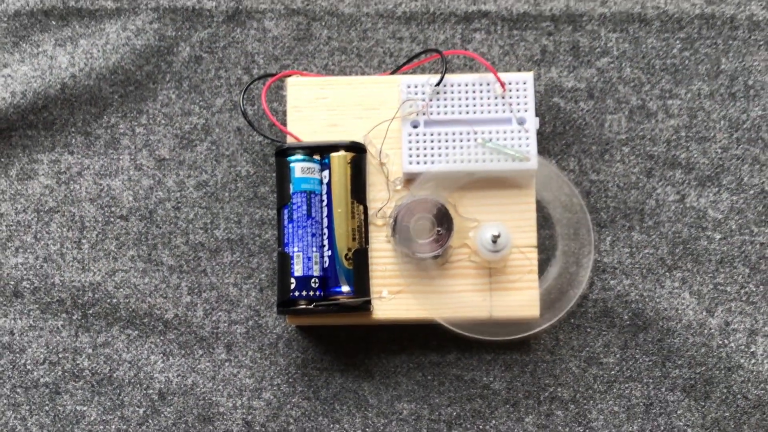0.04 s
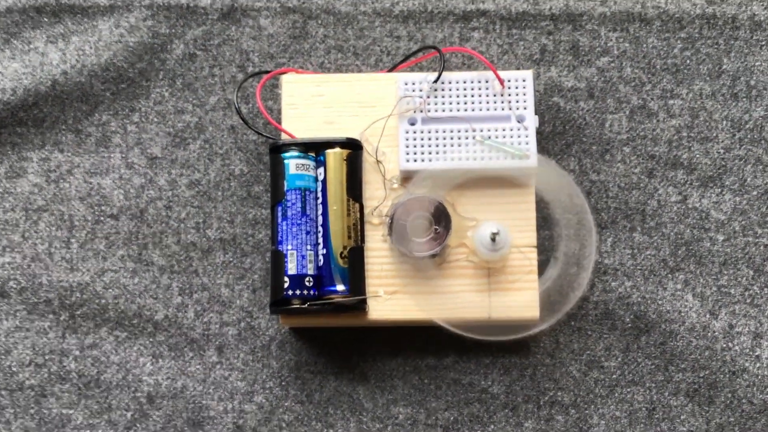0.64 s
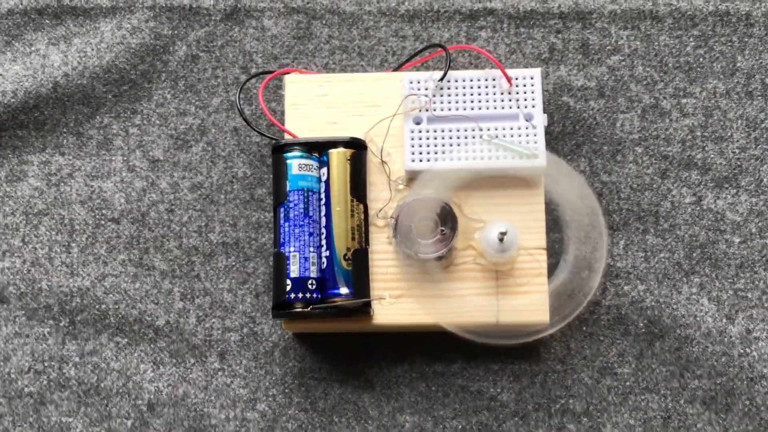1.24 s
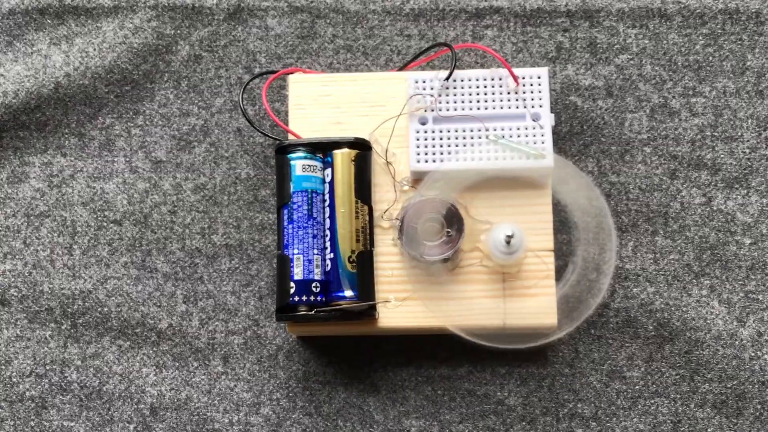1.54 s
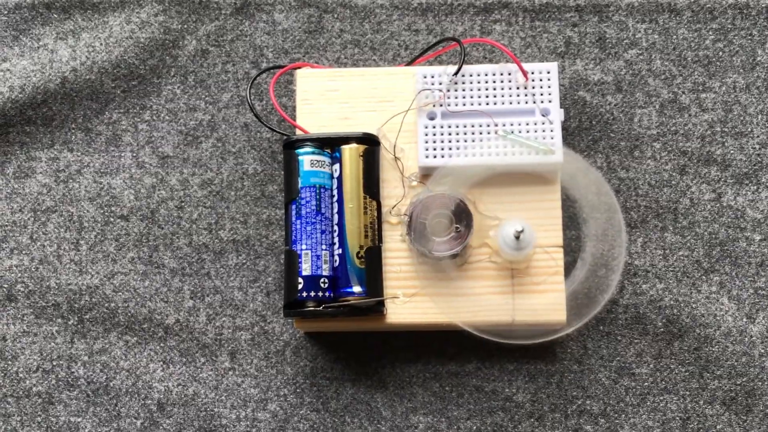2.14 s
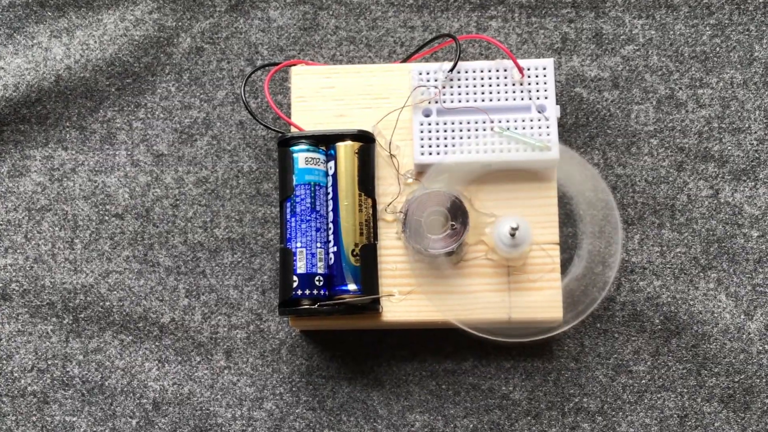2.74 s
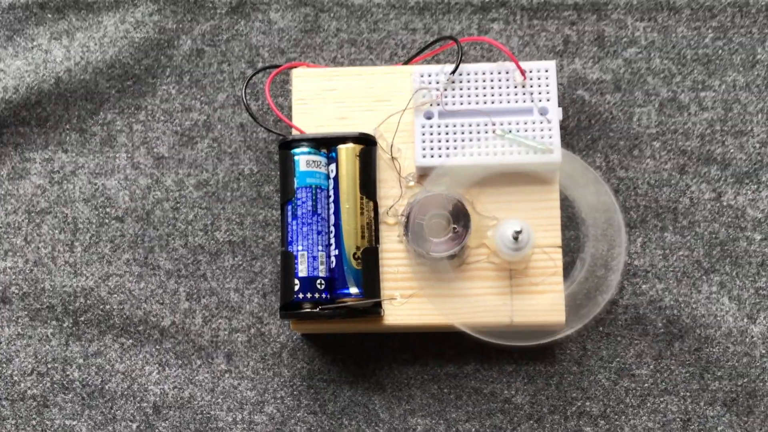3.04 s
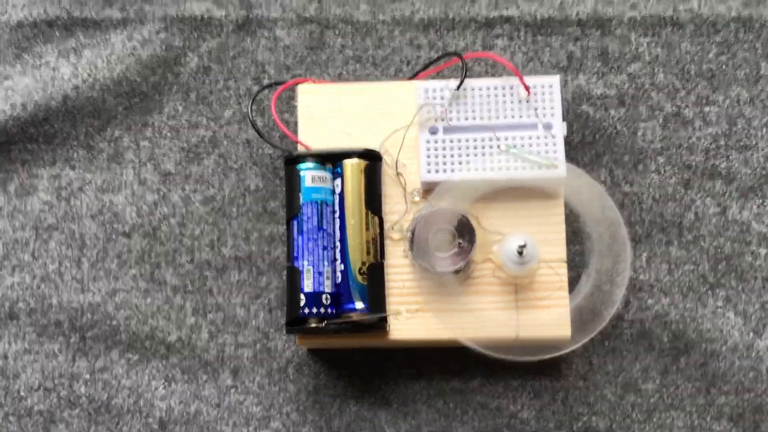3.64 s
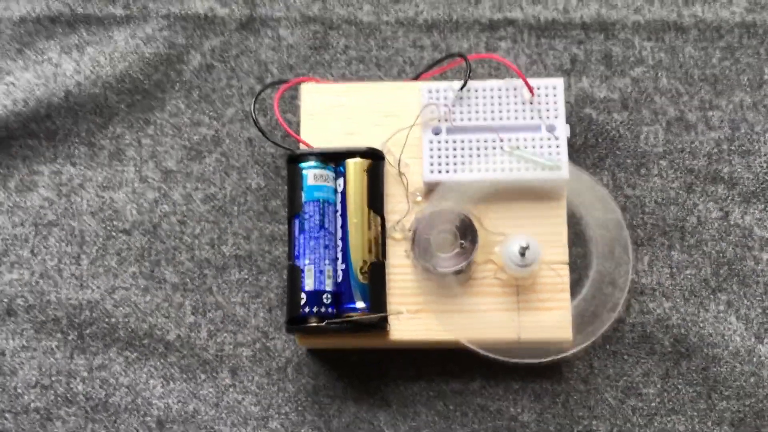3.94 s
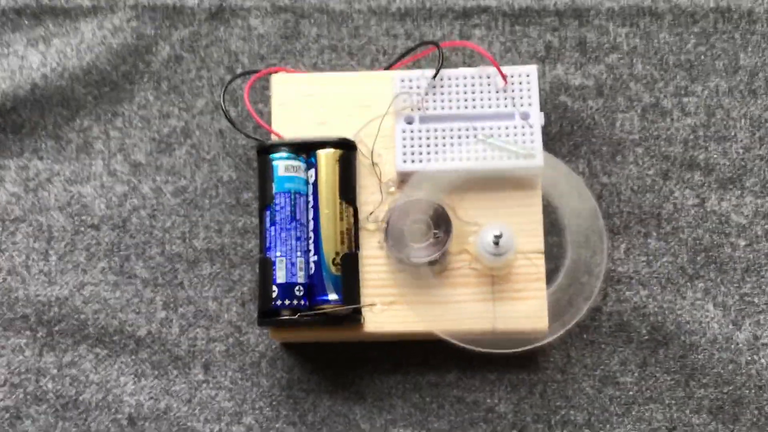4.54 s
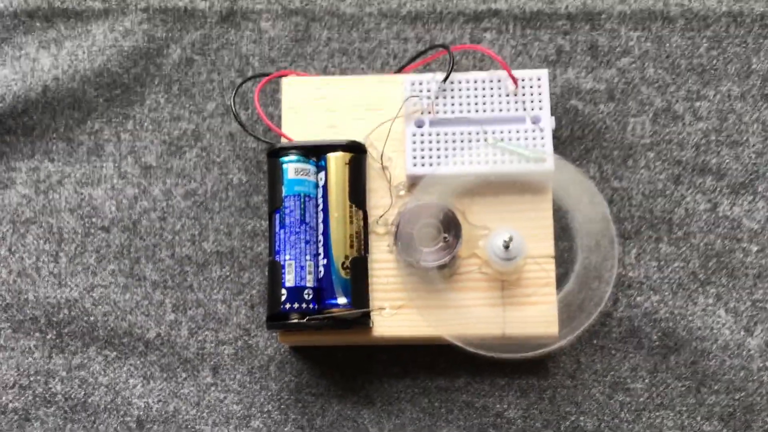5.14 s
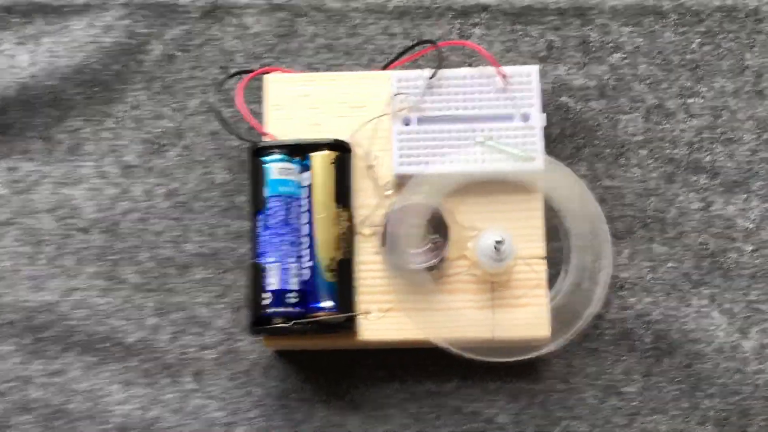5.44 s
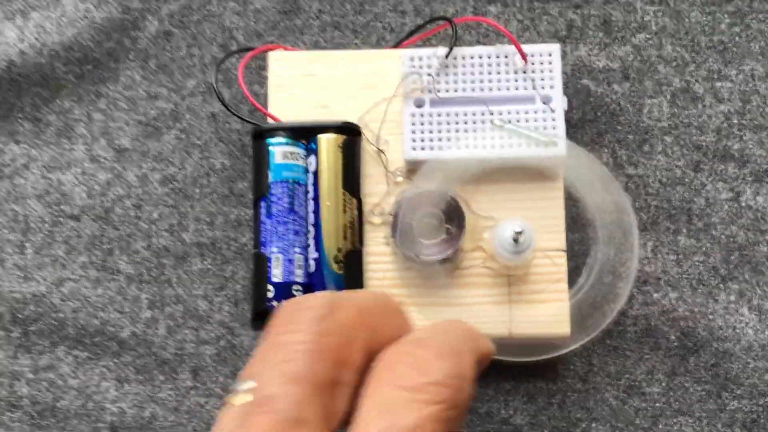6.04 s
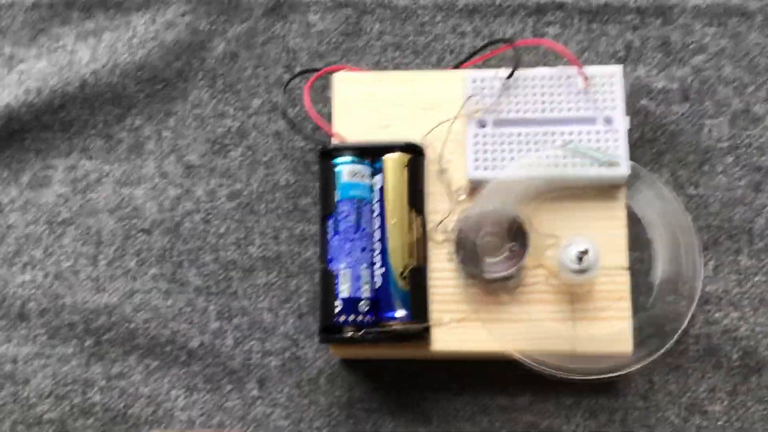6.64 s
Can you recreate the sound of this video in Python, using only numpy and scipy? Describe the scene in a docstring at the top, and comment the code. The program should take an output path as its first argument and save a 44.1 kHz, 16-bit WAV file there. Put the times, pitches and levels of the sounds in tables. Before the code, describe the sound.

A small homemade electric motor spins a wobbling plastic disc, its loose shaft chattering and knocking irregularly while a wire contact scratches on every turn. The rattle is thin and fast, with a few soft handling bumps on the close microphone. Near the end a hand grazes the disc with a short, loud scrape, and the motor carries on slower and quieter, with sparser knocks. The room is small and quiet.

```python
"""From the start, a homemade battery motor spins a wobbling plastic disc on a small wooden board.
The loose shaft chatters and knocks in its bearing; a wire contact scratches it on every turn.
Around 1 s and again from 4 to 5.6 s, the hand-held phone close by picks up soft handling bumps.
At 6.2 s a hand grazes the disc: a loud scrape, then the rotor runs slower, with sparser knocks."""
import sys
import numpy as np
from scipy import signal
from scipy.fft import rfft, irfft
from scipy.io import wavfile

SR = 44100
rng = np.random.default_rng(int(sys.argv[2]) if len(sys.argv) > 2 else 0)


def store_wav(level_fs):
    """Save 16-bit WAV to argv[1]."""
    pcm = np.round(np.clip(np.atleast_2d(level_fs), -1, 1) * 32767)
    wavfile.write(sys.argv[1], SR, pcm.T.astype(np.int16))


N = 298998
T = np.arange(N) / SR

# quiet room spectrum: freq_hz, gain_db
AIR_SPECTRUM = [(25, -28), (55, 5), (80, -10.5), (130, -5), (230, -2), (310, -13.5), (450, -15),
                (1000, -17), (3000, -39.5), (8000, -34), (16000, -34)]
# fingers shifting on the phone: centre_s, half_width_s, rumble_db, rub_db
GRIP_SHIFTS = [(1.08, .15, -60.5, -88), (1.66, 0.16, -58, -89), (1.96, .07, -59, -80),
               (3.645, 0.075, -81, -60), (3.908, 0.054, -62.5, -61), (4.386, 0.092, -61, -81),
               (5.373, 0.25, -68, -64.5), (6.32, 0.079, -60, -65)]
# bumps on the phone: start_s, peak_db, first_hz, last_hz, swell_s
PHONE_BUMPS = [(0.015, -50, 101, 79.6, 0.013), (0.985, -39.5, 101, 83, 0.01), (1.089, -46, 110, 84, 0.0054),
               (1.274, -37.5, 130, 72, 0.0051), (1.324, -41.5, 140, 104, 0.0045),
               (4.159, -43.5, 260, 146, 0.0021), (5.231, -35.5, 674, 150, 0.0012),
               (5.243, -47, 153, 103, 0.0031), (5.415, -44, 280, 139, 0.0013),
               (5.522, -32, 750, 138, 0.00095), (5.525, -37, 151, 88, 0.0019),
               (5.603, -47, 110, 86, 0.0037)]
# disc rim resonances: freq_hz, t60_s, gain_db
RIM_MODES = [(75, 0.094, -26.5), (235, 0.051, -22), (510, 0.0096, -17), (1005, 0.024, -17.5),
             (1580, .008, -8.5), (2220, 0.0066, -12), (3000, 0.0068, -2), (3970, 0.0037, -11),
             (4600, 0.0027, 3.5), (5760, 0.003, 0.5), (8400, 0.0011, 4), (12200, 0.0014, 2.5),
             (14000, 0.0026, -7)]
# rim rubbing on the hand: start_s, length_s, level_db
RIM_RUBS = [(6.189, 0.03, -40.5), (6.242, .017, -40), (6.27, 0.0069, -49), (6.296, 0.0037, -55),
            (6.318, 0.0051, -57.5), (6.353, 0.015, -58.5)]
# contact wire resonances: freq_hz, t60_s, gain_db
WIRE_MODES = [(1413, 0.019, -6.5), (2830, 0.0084, -3.5), (3930, 0.0074, 0), (4870, 0.008, 2),
              (6240, 0.0077, 0), (7000, 0.0069, -2.5), (8380, 0.01, -7.5), (11440, 0.0011, 5),
              (14500, 0.0079, -16)]
# where the wire presses on the shaft: angle_turns, width_turns, pressure_db
WIRE_CONTACTS = [(-.02, 0.084, 12), (.35, 0.063, 4.5), (0.699, 0.22, -1.5)]
# slow drift of the scratch: time_s, gain_db
SCRATCH_DRIFT = [(0, -1), (1.5, -2), (2.2, .5), (4.1, -1), (4.6, -1), (5.45, 0), (5.75, -3), (6.78, -5.5)]
# wire snaps: start_s, level_db
WIRE_SNAPS = [(0.115, -45.5), (1.1213, -43.5), (1.875, -45.5), (2.082, -41), (2.8652, -42), (3.0957, -42),
              (3.3854, -42), (3.5659, -41.5), (3.6722, -44), (3.7432, -44.5), (4.1136, -40.5),
              (4.8944, -45.5), (5, -43.5), (5.251, -43), (5.4936, -45), (6.415, -51.5), (6.4541, -54),
              (6.4678, -58.5), (6.594, -49.5), (6.6116, -62), (6.6436, -62), (6.7376, -55)]
# bearing and board resonances: freq_hz, t60_s, gain_db
BOARD_MODES = [(768, 0.048, -27), (1420, 0.0012, -36.5), (1555, 0.0097, -8), (1760, 0.0041, -3.5),
               (2678, 0.016, -15.5), (2902, 0.0092, -1), (3142, 0.027, -10.5), (4260, 0.0025, 2),
               (5120, 0.016, -20.5), (6060, 0.017, -37)]
# hard shaft knocks: start_s, level_db, first_rebound_loss_db
SHAFT_KNOCKS = [(0.133, -36, 6), (0.1652, -33, 1), (0.3168, -32.5, 14), (0.517, -35, 12), (0.719, -32.5, 8),
                (1.069, -30.5, 7), (1.1007, -35.5, 18), (1.3116, -30.5, 9), (1.3894, -30, 5),
                (1.56, -32.5, 4), (1.6733, -31, 6), (1.9419, -27, 15), (2.0398, -34, 8), (2.1231, -34.5, 7),
                (2.149, -37, 10), (2.3916, -30, 9), (2.4, -30, 15), (2.4689, -46, 19), (2.5672, -30, 16),
                (2.746, -33, 19), (2.7816, -33.5, 19), (2.8599, -37, 0), (3.1282, -26.5, 4.5),
                (3.165, -31.5, 19), (3.2319, -31, 15), (3.37, -30, 6), (3.4156, -28, 18), (3.4408, -28, 9),
                (3.546, -32.5, 4), (3.5618, -33.5, 8), (3.83, -36, 6), (3.8635, -34, 9), (3.8974, -30, 4),
                (3.9739, -32, 20), (4.1898, -29, 11), (4.2206, -33.5, 15), (4.255, -36.5, 9),
                (4.3238, -32, 16), (4.4636, -32, 17), (4.5028, -29.5, 18), (4.6014, -32, 1.5),
                (4.6493, -34, 15), (4.8844, -32, 1), (5.1386, -31.5, 8), (5.2778, -28, 7),
                (5.3154, -30.5, 18), (5.571, -33, 3), (5.924, -35, 9), (6.1967, -35, 18), (6.2073, -21, 2),
                (6.215, -21.5, 16), (6.2208, -17.5, 12), (6.224, -19.5, 8), (6.2367, -23, 1),
                (6.241, -22, 19), (6.2551, -22, 9), (6.2636, -28.5, 21), (6.2695, -20, 18), (6.289, -30, 5),
                (6.3003, -18, 31), (6.307, -27, 6), (6.334, -29.5, 5.5), (6.4511, -47, 6), (6.4562, -35, 9),
                (6.5582, -27, 5.5), (6.5983, -36.5, 9), (6.617, -42.5, 19), (6.6968, -34, 5),
                (6.7332, -39.5, 4)]
# rotor speed: time_s, turns_per_s
ROTOR_SPEED = [(0.0, 28.7), (0.8, 28.96), (1.6, 28.73), (2.4, 28.53), (3.2, 28.54), (4.0, 28.48),
               (4.8, 28.2), (5.5, 28.2), (6.19, 27.82), (6.35, 21.5)]
# brief dips in chatter and scratch: centre_s
LULLS_S = [2.81, 3.0, 4.33, 4.99, 5.78, 6.06]


def undb(db):
    """Decibels to gain."""
    return 10 ** (np.asarray(db) / 20)


def unit(x):
    """Scale to rms 1."""
    return x / np.sqrt(np.mean(x ** 2))


def curve(table):
    """Straight lines through (time_s, value) rows."""
    return np.interp(T, *np.transpose(table))


def swell(centre_s, half_width_s):
    """Gaussian rise and fall, peak 1."""
    return np.exp(-np.minimum(((T - centre_s) / half_width_s) ** 2, 50))


def to_samples(times_s):
    """Nearest sample indices."""
    return np.clip(np.round(times_s * SR).astype(int), 0, N)


def colour(x, spectrum, size=4096):
    """Causal unit-energy filter shaped by (freq_hz, gain_db) rows."""
    hz, db = np.transpose(spectrum)
    bins_hz = np.arange(size // 2 + 1) * SR / size
    gain = undb(np.interp(np.log(bins_hz + 1), np.log(hz), db))
    cepstrum = irfft(np.log(gain))[:size // 2]
    cepstrum[0] /= 2
    response = irfft(np.exp(rfft(2 * cepstrum, size)))
    return signal.fftconvolve(x, response / np.linalg.norm(response))[:N]


def band_noise(low_hz, high_hz):
    """Band-passed noise, rms 1."""
    band = signal.butter(3, [low_hz, high_hz], "band", fs=SR, output="sos")
    return unit(signal.sosfilt(band, rng.standard_normal(N)))


def ring(modes, times_s, sizes, scatter_db, detune, rise_s=0.0001):
    """Blows ring decaying modes; pitch and weight vary per blow."""
    starts = to_samples(times_s)[:, None]
    out = np.zeros(N)
    for hz, t60_s, db in modes:
        pitch_draw, gain_draw = np.clip(rng.standard_normal((len(times_s), 2)), -1.5, 1.5).T
        steps = np.arange(int(t60_s * SR))
        t = steps / SR
        envelope = undb(db - 60 * t / t60_s) * (1 - np.exp(-t / rise_s))
        pitch_hz = hz * (1 + detune * pitch_draw[:, None])
        gain = sizes * undb(scatter_db * gain_draw)
        waves = gain[:, None] * envelope * np.cos(2 * np.pi * pitch_hz * t)
        out += np.bincount((starts + steps).ravel(), waves.ravel(), N)[:N]
    return out


def room_air(level_db=-68):
    """Faint, steady, mostly low room noise."""
    return undb(level_db) * unit(colour(rng.standard_normal(N), AIR_SPECTRUM))


def reflections(x, t60_s=0.062, wet_db=-18, echo_s=0.001415, echo_db=-13):
    """One bounce between phone and board, plus the short, dull tail of a small furnished room."""
    t = T[:SR // 2]
    tail = rng.standard_normal(len(t)) * undb(-60 * t / t60_s) * (t > 0.003)
    tail = signal.sosfilt(signal.butter(1, 6000, fs=SR, output="sos"), tail)
    echo = undb(echo_db) * np.interp(T - echo_s, T, x)
    return x + echo + undb(wet_db) * signal.fftconvolve(x, tail / np.linalg.norm(tail))[:N]


def grip(rest_rumble_db=-68.5, rest_rub_db=-72.5):
    """Rumble and rub swell as fingers shift on the phone."""
    rumble, rub = undb(rest_rumble_db), undb(rest_rub_db)
    for centre_s, half_width_s, rumble_db, rub_db in GRIP_SHIFTS:
        shift = swell(centre_s, half_width_s)
        rumble = np.hypot(rumble, undb(rumble_db) * shift)
        rub = np.hypot(rub, undb(rub_db) * shift)
    return rumble * band_noise(45, 113) + rub * band_noise(91, 287)


def phone_bumps(settle_s=0.00094):
    """Soft bumps; pitch sinks as the finger settles."""
    out = np.zeros(N)
    for start_s, peak_db, first_hz, last_hz, swell_s in PHONE_BUMPS:
        t = np.maximum(T - start_s, 0)
        cycles = last_hz * t + (first_hz - last_hz) * settle_s * (1 - np.exp(-t / settle_s))
        envelope = t / swell_s * np.exp(1 - t / swell_s)
        out -= undb(peak_db) * envelope * np.sin(2 * np.pi * cycles)
    return out


def rim_rasp(grains=450, span_s=0.2, grit_db=3, ease_db_per_s=652):
    """The rim slips on the hand in gritty rubs, each easing off."""
    time_draw, sign_draw, size_draw = rng.random((grains, 3)).T
    times_s = RIM_RUBS[0][0] + span_s * time_draw
    pressure = np.zeros(grains)
    for start_s, length_s, db in RIM_RUBS:
        easing_s = np.maximum(times_s - start_s - length_s, 0)
        pressure += undb(db - ease_db_per_s * easing_s) * (times_s >= start_s)
    sizes = np.sign(sign_draw - 0.5) * pressure * undb(grit_db * (2 * size_draw - 1.5))
    return ring(RIM_MODES, times_s, sizes, scatter_db=9.5, detune=0.065)


def hand_graze(squeak_s=6.198, squeak_hz=3650, squeak_db=-24):
    """The spinning rim ticks against the hand, squeaks as it sticks, then slips."""
    touch_s, touch_db = np.array([6.1873, 6.1892]), [-14, -19]
    touches = np.bincount(to_samples(touch_s), undb(touch_db), N)
    tick = colour(touches, spectrum=[(100, -30), (500, 19.5), (1500, -24), (6000, 4), (16000, 12)])
    phase = 2 * np.pi * squeak_hz * (T - squeak_s)
    squeak = undb(squeak_db) * swell(squeak_s, 0.0014) * (np.sin(phase) + 0.08 * np.sin(2 * phase))
    return tick + squeak + rim_rasp()


def wire_pings(times_s, sizes):
    """The wire rings; pitch wanders with the point of touch."""
    return ring(WIRE_MODES, times_s, sizes, scatter_db=4, detune=0.059)


def wire_scratch(turns, slips=2600, floor_db=-3.5, spread_db=7, max_catch=1.47):
    """The springy wire slips on the shaft, pressing hardest at set angles in each turn."""
    time_draw, size_draw = rng.random((slips, 2)).T
    times_s = time_draw * T[-1]
    slip_turns = np.interp(times_s, T, turns)
    pressure = np.full(slips, undb(floor_db))
    for angle_turns, width_turns, db in WIRE_CONTACTS:
        offset_turns = (slip_turns - angle_turns + 0.5) % 1 - 0.5
        pressure += undb(db) * np.exp(-0.5 * (offset_turns / width_turns) ** 2)
    catch_db = spread_db * np.minimum(-np.log(size_draw), max_catch)  # most slips are small
    return unit(wire_pings(times_s, pressure * undb(catch_db)))


def wire_snaps(skid_s=0.0025, touches=4, fade_db=20):
    """The wire catches and snaps off, skidding in a few quick touches."""
    start_s, level_db = np.transpose(WIRE_SNAPS)[:, :, None]
    progress = rng.random((len(start_s), touches)) * np.linspace(0, 1, touches)
    times_s = start_s + skid_s * progress
    return wire_pings(times_s.ravel(), undb(level_db - fade_db * progress).ravel())


def board_ring(times_s, sizes):
    """Shaft blows ring the bearing and the board under it."""
    return ring(BOARD_MODES, times_s, sizes, scatter_db=1.5, detune=0.026, rise_s=0.00016)


def rattle_colour(x, low_cut_hz=590, notch_hz=890, notch_q=5):
    """The rattle sounds thin: little bass, and a narrow dip near 890 Hz."""
    highpass = signal.butter(4, low_cut_hz, "high", fs=SR, output="sos")
    return signal.lfilter(*signal.iirnotch(notch_hz, notch_q, fs=SR), signal.sosfilt(highpass, x))


def shaft_chatter(turns, bounces=2000, bounce_s=0.0054, jitter=0.2, lean_db=2, spread_db=6.5):
    """The shaft bounces in its bearing, hardest while the disc's unbalance leans on it."""
    gap_draw, force_draw = rng.standard_normal((bounces, 2)).T
    times_s = np.cumsum(bounce_s * np.exp(jitter * gap_draw))
    lean = np.cos(2 * np.pi * (np.interp(times_s, T, turns) + 0.06))
    force_db = lean_db * lean + spread_db * np.clip(force_draw, -2, 1.34)
    return unit(board_ring(times_s, undb(force_db)))


def shaft_knocks(touches=3, rebound_s=0.0049):
    """The shaft crosses its whole play, strikes hard and rebounds, ever weaker."""
    start_s, level_db, loss_db = np.transpose(SHAFT_KNOCKS)[:, :, None]
    touch = np.arange(touches)
    times_s = start_s + rebound_s * touch
    board_gain = 0.33 * sum(undb(db) for _, _, db in BOARD_MODES)
    sizes = undb(level_db - loss_db * touch ** 1.13) / board_gain
    return board_ring(times_s.ravel(), sizes.ravel())


def motor(full_turns_per_s=28.2, chatter_base_db=-54, scratch_base_db=-56.5):
    """Chatter and scratch rise as the rotor rocks around each knock, and fade as it slows."""
    turns_per_s = curve(ROTOR_SPEED)
    turns = np.cumsum(turns_per_s) / SR
    rocking = np.tanh(sum(swell(start_s, 0.037) for start_s, _, _ in SHAFT_KNOCKS))
    slowing_db = -3 * np.maximum(full_turns_per_s - turns_per_s, 0)
    lull_db = -7 * sum(swell(centre_s, 0.024) for centre_s in LULLS_S)
    chatter_db = chatter_base_db + 2.5 * rocking + slowing_db + lull_db
    scratch_db = scratch_base_db + 0.6 * rocking + slowing_db + lull_db + curve(SCRATCH_DRIFT)
    shaft = undb(chatter_db) * shaft_chatter(turns) + shaft_knocks()
    wire = undb(scratch_db) * wire_scratch(turns) + wire_snaps()
    return rattle_colour(shaft + wire)


def scene():
    """Motor and graze in the room, over handling and room noise; mono."""
    rattle = motor()
    air = room_air()
    return (reflections(rattle + hand_graze()) + grip() + phone_bumps() + air)[None]


def record(dry):
    """The phone cuts the deepest bass and the top."""
    low_hz, top_hz = 42, 15800
    highpass = signal.butter(4, low_hz, "high", fs=SR, output="sos")
    lowpass = signal.ellip(10, 0.2, 80, top_hz, fs=SR, output="sos")
    return signal.sosfilt(lowpass, signal.sosfilt(highpass, dry))


dry = scene()
out = record(dry)
store_wav(out)
```